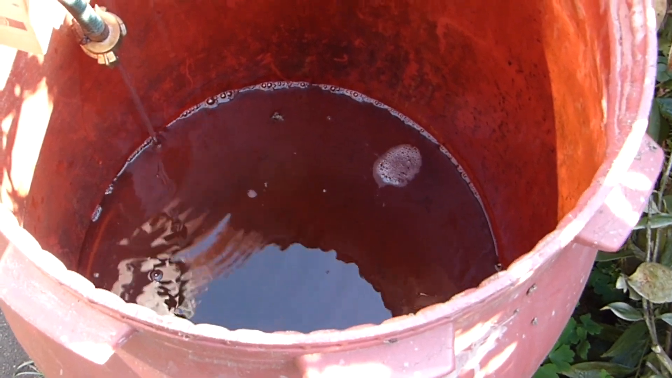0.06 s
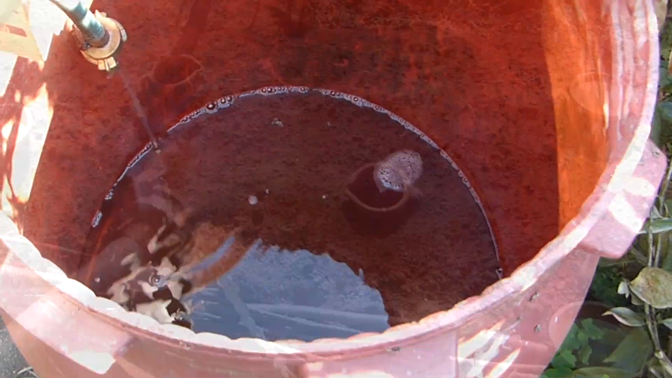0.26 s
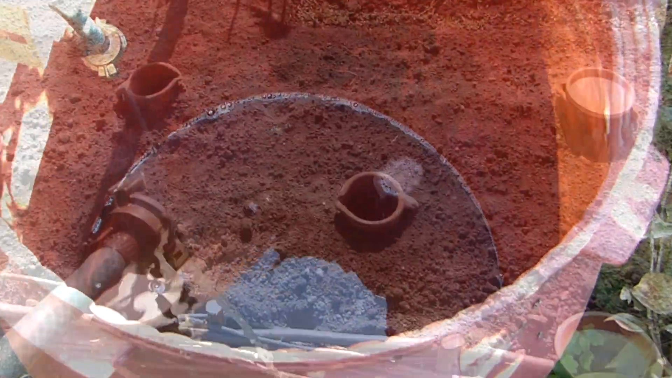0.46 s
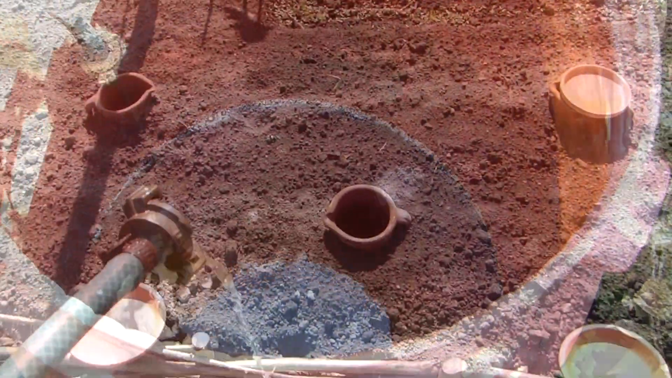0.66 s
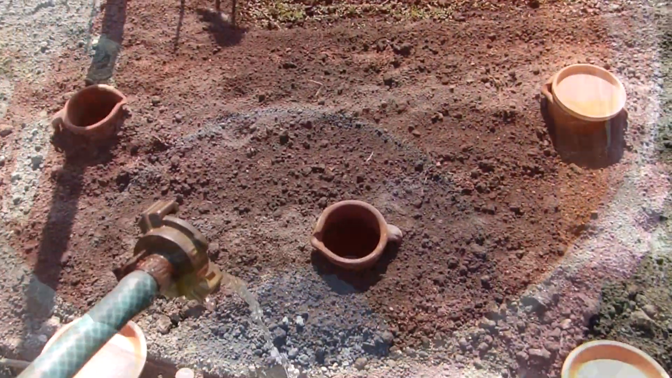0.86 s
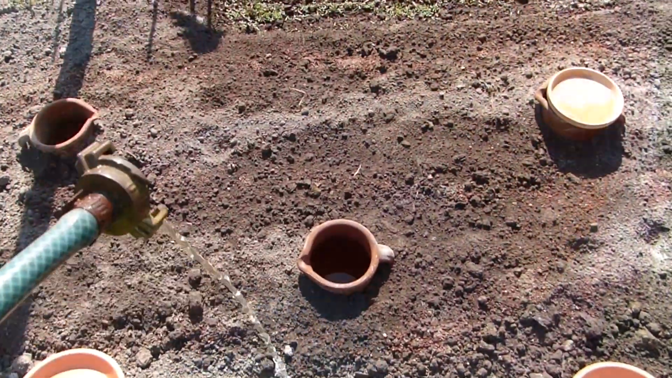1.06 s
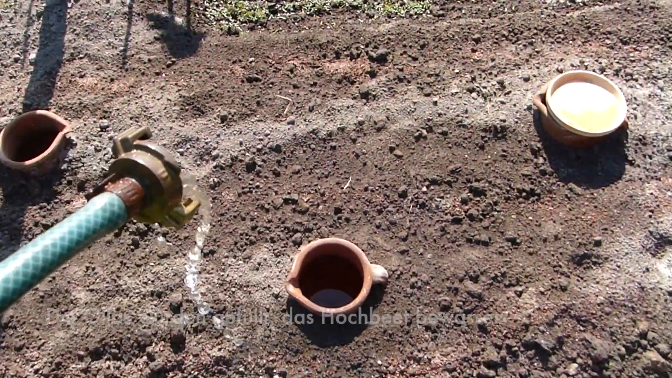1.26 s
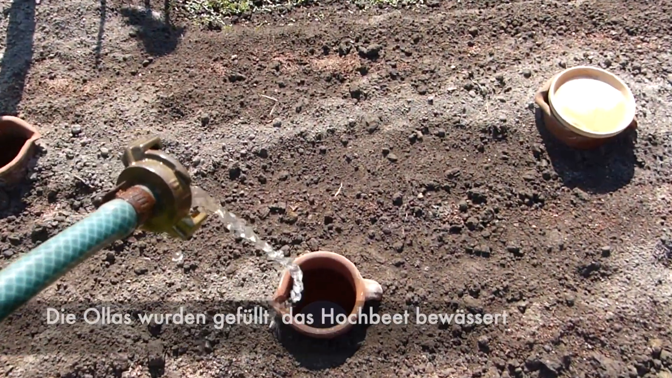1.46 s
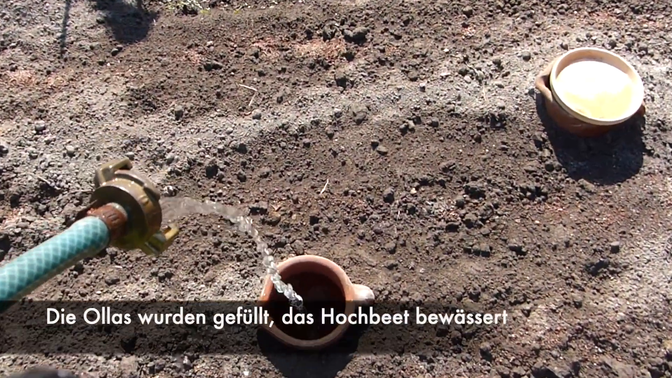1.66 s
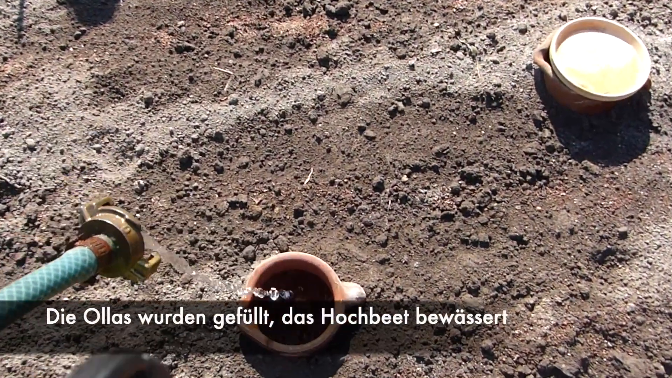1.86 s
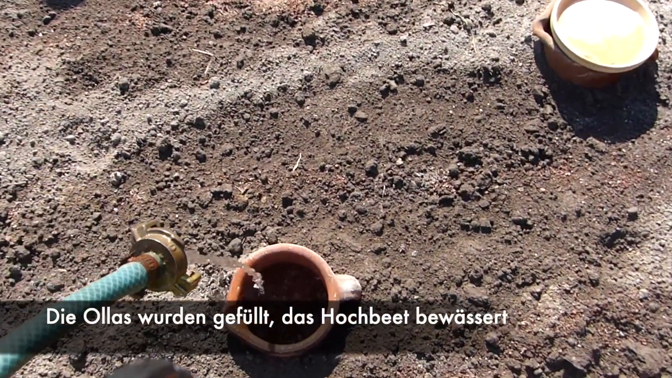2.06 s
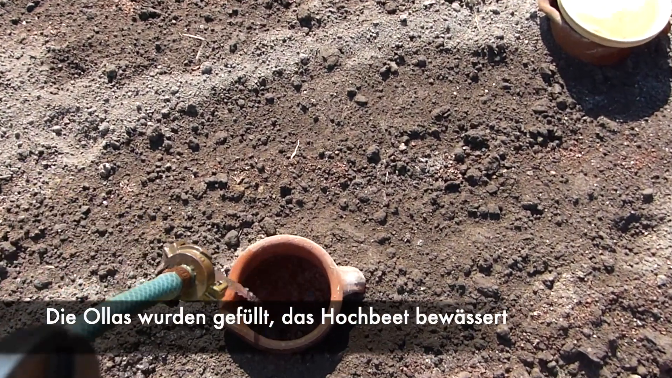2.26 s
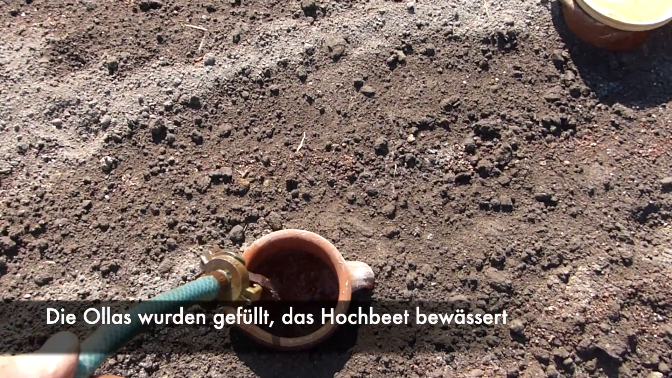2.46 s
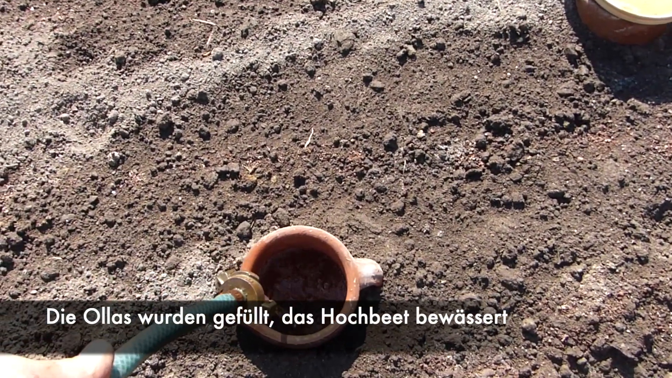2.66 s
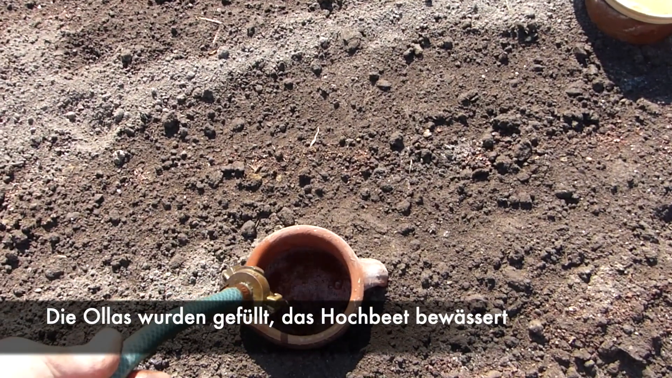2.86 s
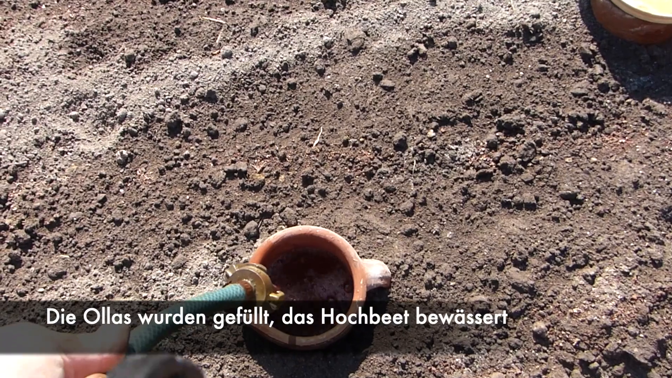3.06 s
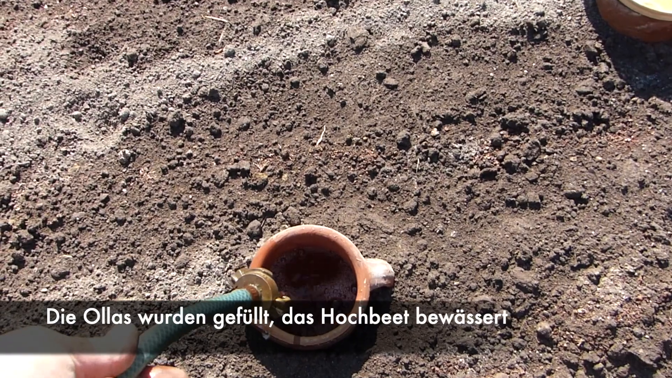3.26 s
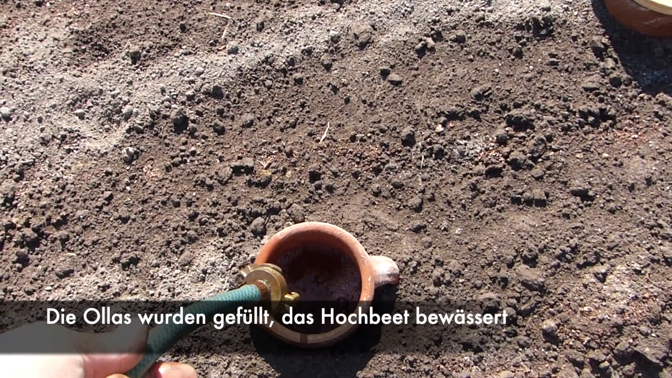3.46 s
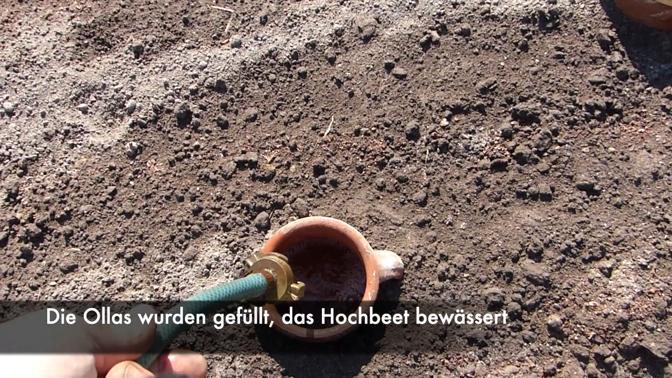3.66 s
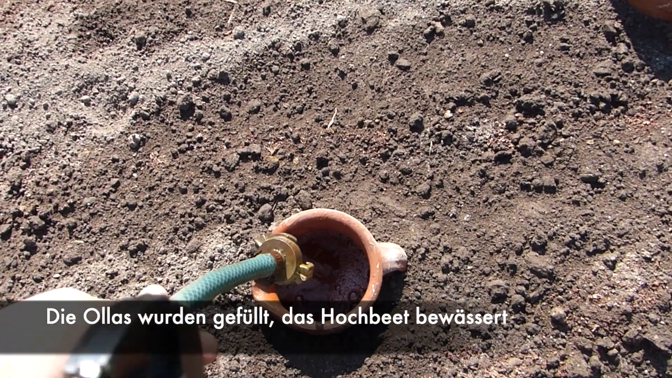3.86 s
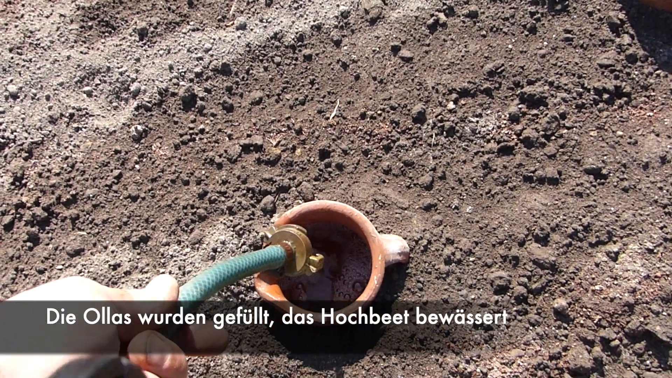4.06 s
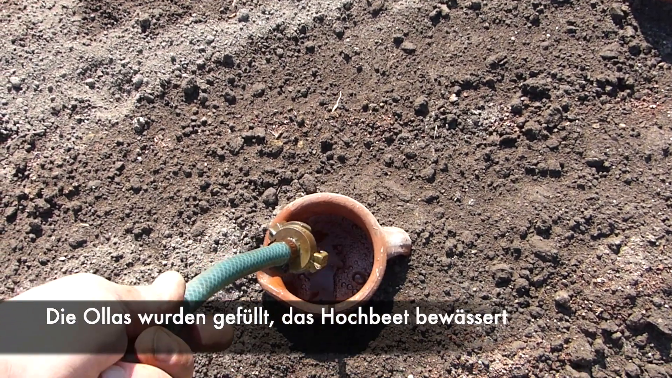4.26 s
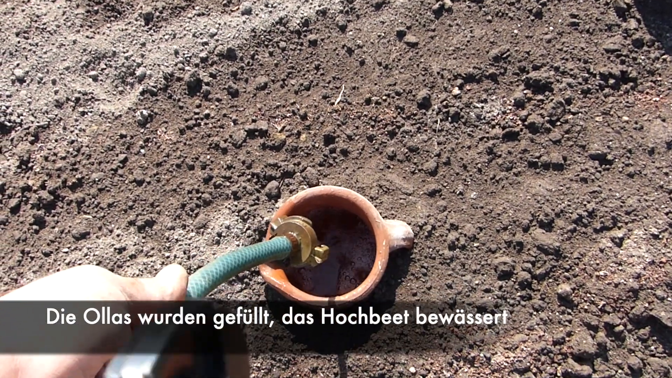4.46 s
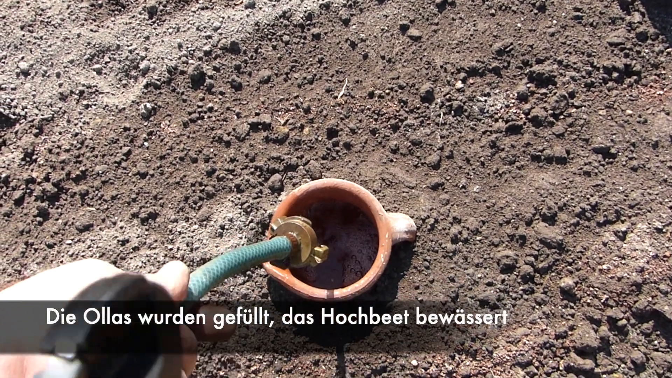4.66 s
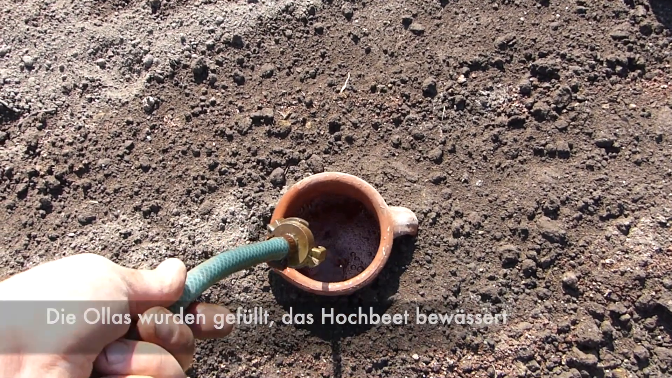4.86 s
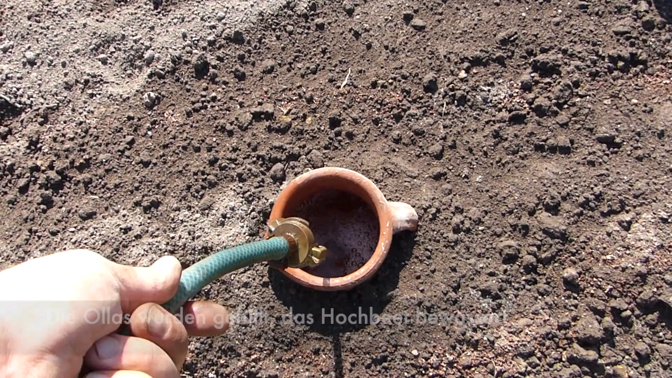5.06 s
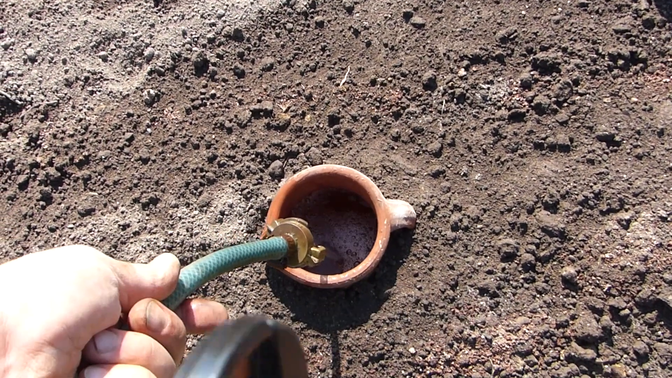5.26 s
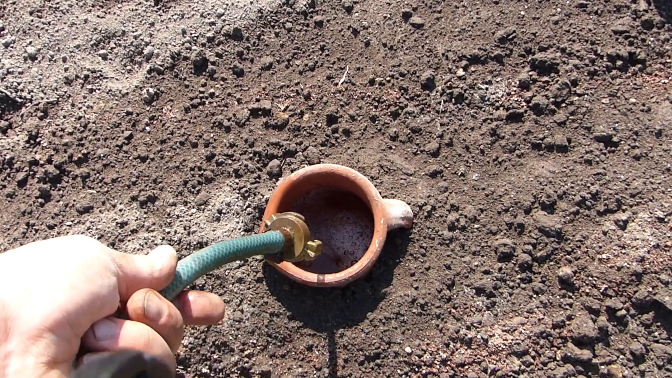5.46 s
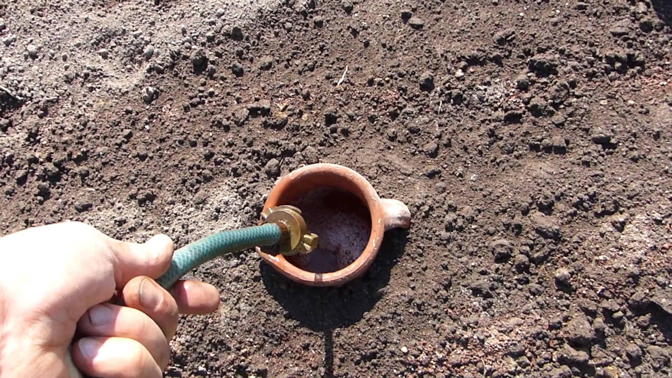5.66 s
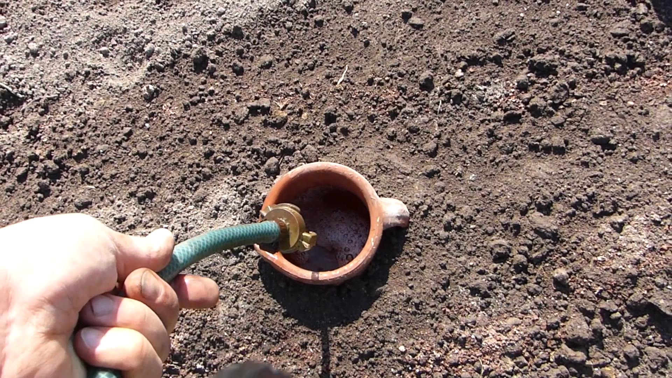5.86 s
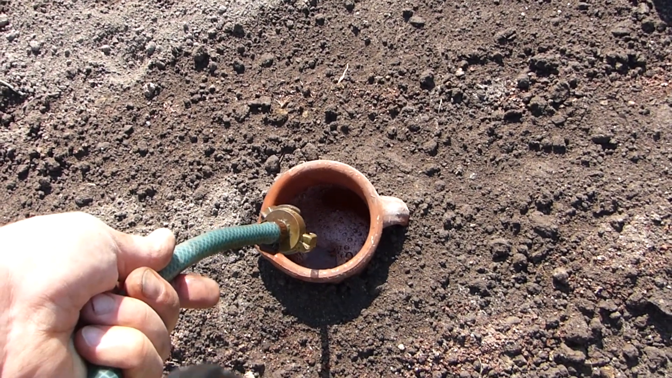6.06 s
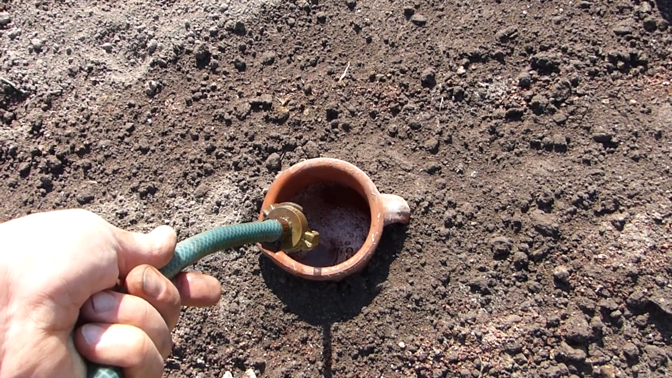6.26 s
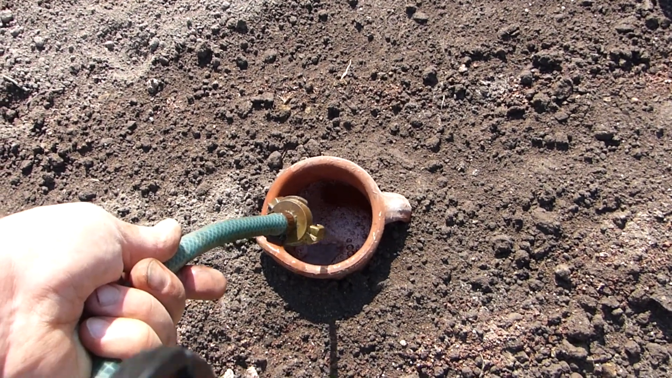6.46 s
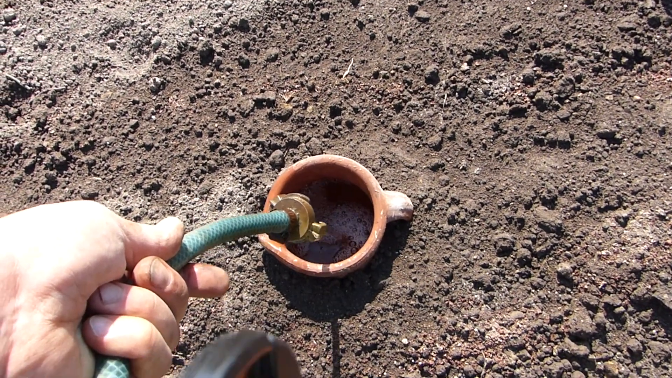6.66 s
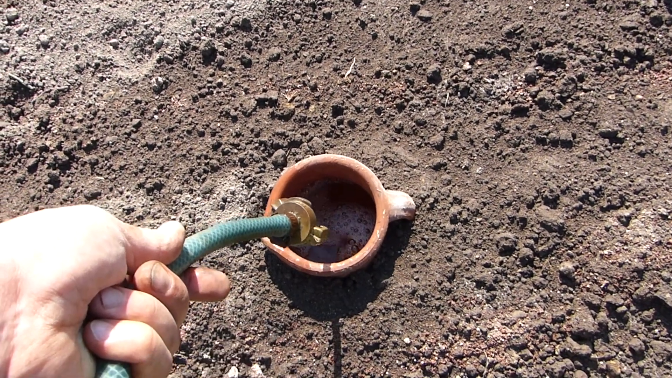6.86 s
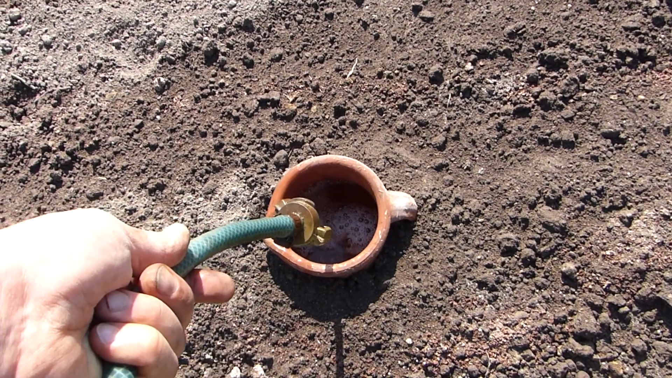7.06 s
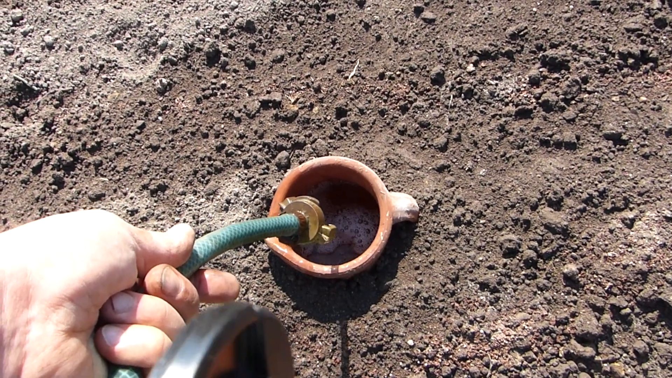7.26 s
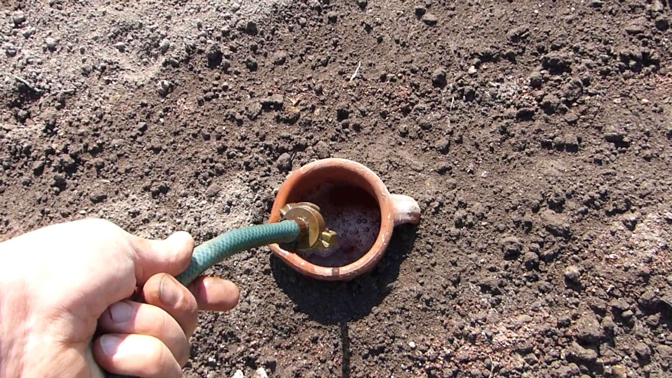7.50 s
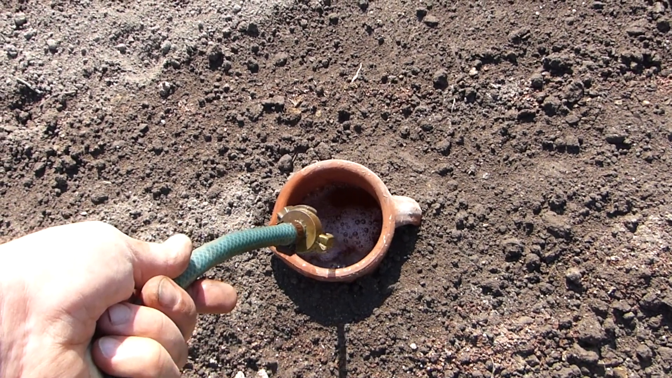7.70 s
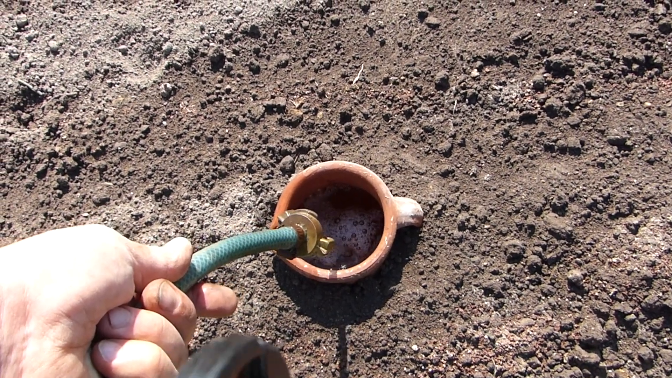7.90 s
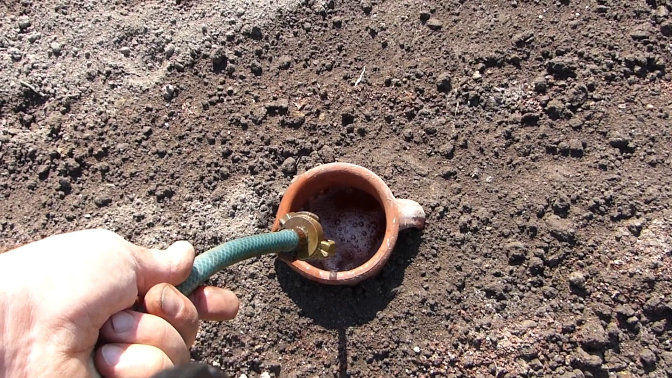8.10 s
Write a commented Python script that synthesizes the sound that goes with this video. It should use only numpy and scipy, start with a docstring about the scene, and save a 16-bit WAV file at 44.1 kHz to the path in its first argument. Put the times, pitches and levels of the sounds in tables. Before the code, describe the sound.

Water crackles onto earth, plunges gulping into a buried clay jar, then trickles softly with small bubbles among bright birdsong and faint plastic knocks.

```python
"""In a garden, a hose spatters on dry soil, then splashes into a buried clay pot that gulps on one low note.
Later the jet runs down the inner wall: mostly small bubbles and fizz, so songbirds stand out all round. A
dangling lens cap now and then knocks on the camera. Water is made of many short damped tones and noise, the pot
of ringing air, the birds of gliding tones, the knocks of body tones and noise bursts, and the background of
coloured noise."""
import sys
import numpy as np
from scipy import signal
from scipy.fft import rfft, irfft, next_fast_len
from scipy.io import wavfile
from scipy.ndimage import uniform_filter1d, map_coordinates

SR = 44100
rng = np.random.default_rng(int(sys.argv[2]) if len(sys.argv) > 2 else 0)


def store_pcm(level_fs):
    """Save levels as 16-bit WAV."""
    pcm = np.round(np.clip(level_fs, -1, 1) * 32767).astype(np.int16)
    wavfile.write(sys.argv[1], SR, np.atleast_2d(pcm).T)


N = 358533  # length in samples

# Background noise: (time [s], level [dB])
NOISE_LEVEL = [(.2, -83), (.55, -48), (1.1, -36.5), (2.2, -43.5), (3.6, -35.5), (4.8, -35), (4.9, -41.5),
               (5.25, -38.5), (6.2, -34), (8.1, -34)]
# Tone colour of the background noise: (frequency [Hz], level [dB])
NOISE_COLOUR = [(25, -3), (58, -11), (100, -2), (200, -0.5), (330, -6.5), (720, 2.5), (1500, -4),
                (3000, -11.5), (12500, -21), (16000, -31)]
# How alike the background noise is in both ears, negative when opposite: (frequency [Hz], likeness [-1 to 1])
NOISE_LIKENESS = [(60, 0.98), (300, -0.74), (700, -0.63), (2500, 0.64)]

# Notes of a rising two-note phrase: (time into phrase [s], length [s], first pitch [Hz], last pitch [Hz],
# added level [dB])
ZIP_NOTES = [(0, 0.052, 5530, 7660, -2), (.043, .026, 5410, 7590, 2.5)]
# When the rising phrase is sung: (time [s], level [dB])
ZIP_TIMES = [(3.158, -38), (5.186, -34), (6.922, -24.5), (7.061, -24.5), (7.206, -27.5)]
# When single thin lisps are sung: (time [s], level [dB])
LISP_TIMES = [(1.28, -31), (1.375, -35), (1.481, -35)]
# Hooked notes of the seesaw phrase: (time into phrase [s], length [s], held pitch [Hz], added level [dB])
SEESAW_NOTES = [(0, 0.06, 4440, 0.5), (0.084, 0.051, 4480, -5.5), (.185, .13, 3364, -15.5)]
# Lone hooked notes: (time [s], length [s], held pitch [Hz], level [dB])
HOOKS = [(6.597, 0.047, 3810, -30), (6.925, 0.073, 4720, -27.5), (7.322, 0.054, 3650, -29.5),
         (7.643, 0.05, 3950, -27), (7.962, 0.088, 4780, -30)]
# Pitch shapes of curled notes: (time into note [s], pitch [Hz])
TWIRL_SHAPE = [(0, 3750), (.006, 6100), (.019, 6700), (.024, 4930), (.031, 5780), (.035, 4700), (.04, 5110),
               (.048, 4040)]
UPTURN_SHAPE = [(0, 2040), (.016, 2340), (.034, 3550)]
ARCH_SHAPE = [(0, 3450), (.009, 4320), (.018, 3200), (.042, 2700), (.062, 2150)]
HIGH_ARCH_SHAPE = [(0, 6240), (.013, 7400), (.05, 5400)]
# When the curled notes are sung: (time [s], level [dB])
TWIRL_TIMES = [(5.582, -18), (5.668, -19), (5.754, -19.5)]
UPTURN_TIMES = [(5.361, -25.5), (5.501, -25.5)]
ARCH_TIMES = [(4.963, -25), (5.145, -24)]
HIGH_ARCH_TIMES = [(5.027, -33.5), (6.77, -31)]
# Quick downward chirps: (time [s], length [s], first pitch [Hz], level [dB])
CHIRPS = [(4.032, 0.033, 5420, -22.5), (4.277, 0.037, 5500, -19), (4.863, 0.033, 4650, -28.5),
          (5.308, 0.019, 5910, -25), (5.45, 0.014, 6300, -24), (5.832, 0.036, 3730, -27),
          (5.922, 0.065, 4490, -21)]
# Held whistles that sag a little: (time [s], length [s], first pitch [Hz], level [dB])
WHISTLES = [(1.025, .075, 7450, -34), (3.212, 0.5, 3930, -33), (4.97, 0.27, 9000, -41.5),
            (5.253, 0.12, 7450, -29.5), (5.396, 0.083, 7300, -28.5), (7.274, 0.059, 5790, -27.5)]
# Notes with a fast, wide vibrato: (time [s], length [s], pitch [Hz], swing [Hz], swing rate [per s],
# level [dB])
BUZZES = [(3.83, .33, 8300, 280, 115, -41), (5.97, 0.16, 2540, 260, 68, -31.5)]

# Songs of evenly spaced or slowing notes, weaker on both sides of a climax
SEESAW_SONG = dict(start_s=3.21, period_s=.285, count=8, climax_s=4.17, climax_db=-17.5, fall_db=10)
SWOOP_SONG = dict(start_s=4.347, period_s=.0639, count=8, climax_s=4.36, climax_db=-19.5, fall_db=23)
LISP_SONG = dict(start_s=5.535, period_s=.089, slowing_s=.00088, count=10, climax_s=6.34,
                 climax_db=-22.5, fall_db=5.5)
# The note after a lone hook: its first pitch over the hook's, and the share it falls
SLUR = dict(gap_s=.012, length_s=.04, lift=1.13, fall=0.201)
# A short hoarse note between the upturns
CROAK = dict(start_s=5.394, length_s=0.027, hz=2163, db=-17.5, rough=0.055)
SWOOP_S, SWOOP_HZ = 0.034, 4770
LISP_S, LISP_FROM_HZ, LISP_TO_HZ = 0.06, 5920, 5480
FALL_SHARE, SAG_SHARE = 0.565, .94  # last pitch over first, for a chirp and a whistle
SETTLE = 1.4  # how much a glide levels off
HOOK_SHARE = 0.2664  # how far above its held pitch a hooked note starts
NOTE_ATTACK, NOTE_RELEASE = 0.26, 0.39  # shares of a note's length
BIRD_LEFT_DB, BIRD_ECHO_DB, BIRD_T60_S = -6.5, -2.5, .55  # left minus right, echo level, echo time

# Lens cap striking the camera: (time [s], level [dB])
KNOCKS = [(0.628, -37.5), (0.691, -37.5), (0.908, -28.5), (0.95, -29.5), (2.534, -30.5), (2.611, -29.5),
          (2.769, -31.5), (4.819, -26.5), (4.856, -28), (4.92, -28), (5.106, -26.5), (7.293, -33.5),
          (7.836, -36)]
# Ringing tones of the camera body: (frequency [Hz], level [dB], time to fade by 60 dB [s])
BODY_TONES = [(696, 12.5, 0.063), (470, -1, 0.13), (885, 0.5, 0.037), (227.3, -8, 0.29)]
KNOCK_RING_DB, KNOCK_THUD_DB, KNOCK_TICK_DB = 9.5, 20, 8  # added to each knock's level

# Tone colour of the spray: (frequency [Hz], level [dB])
SPRAY_COLOUR = [(1200, -11), (4800, -3), (9500, 3.5), (13000, -2.5), (16000, -14)]
# Jet wandering over the soil: (time [s], splash level [dB])
ON_SOIL = [(0.28, -57.5), (0.476, -46.5), (0.526, -37), (0.97, -37), (1.19, -30.5), (1.23, -25.5),
           (1.38, -37), (1.424, -40), (1.56, -43.5)]
# Jet falling free into the pot: (time [s], splash level [dB])
IN_POT = [(1.59, -24.5), (1.71, -22), (1.926, -27.5), (1.975, -17.5), (2.03, -23), (2.11, -38),
          (2.155, -30.5), (2.175, -21.5), (2.23, -21), (2.27, -33.5), (2.34, -23.5), (2.376, -31),
          (2.72, -25), (2.782, -34.5), (2.87, -28), (3.25, -28)]
# The pool deepening under the jet: (time [s], share of the splash that is bubbles [0-1])
POOL_DEPTH = [(1.5, 0), (1.65, 0.4), (2.2, 0.68), (2.5, 0.84)]
# Jet running down the wall: (time [s], bubble level [dB], fizz level [dB])
WALL_FLOW = [(3.25, -36.5, -47), (3.55, -43, -47), (3.72, -31, -44), (4.25, -32, -35.5),
             (4.7, -37.5, -38.5), (4.95, -52, -55), (5.2, -42, -45), (5.4, -38.5, -38), (6.7, -34.5, -41),
             (8.1, -41, -42.5)]
# Hard drops slapping soil and clay: (time [s], level [dB])
SLAPS = [(0.597, -27), (0.679, -20), (0.728, -23.5), (1.058, -21), (1.1465, -18), (1.21, -17),
         (1.228, -14.5), (1.4286, -16), (1.462, -16), (1.602, -13), (1.648, -13.5), (2.1712, -14),
         (2.2143, -16), (2.856, -12.5), (6.6115, -19), (7.836, -24.5)]
# Largest single bubbles: (time [s], level [dB], starting pitch [Hz])
POPS = [(1.6282, -6.5, 2980), (1.697, -4.5, 1560), (1.7295, -4, 4440), (1.737, -3, 4640),
        (1.7725, -2, 3920), (1.8077, -7, 4300), (1.822, -14.5, 1890), (1.839, -6, 3660),
        (1.874, -7.5, 3070), (1.9665, -11, 1274), (2.0226, -5, 2350), (2.3386, -7, 2990), (2.54, -8, 2930),
        (2.6426, -6, 4260), (2.6818, -11, 2870), (2.6993, -9, 4400), (2.7375, -2, 2690), (3.0799, -9, 4660),
        (4.315, -6, 3310), (4.4906, -7, 3450), (6.739, -11, 3600), (6.7863, -13.5, 3750),
        (7.496, -12, 4570), (7.836, -18.5, 1790), (7.924, -14.5, 4100)]
# Gulps of the belly: (time [s], level [dB], starting pitch [Hz])
GULPS = [(1.853, -19, 553), (1.871, -18, 633), (1.91, -17.5, 575), (1.947, -17, 670), (1.962, -14, 595),
         (1.978, -15.5, 570), (2.026, -15.5, 575), (2.175, -18.5, 530), (2.213, -17, 636),
         (2.338, -13.5, 582), (2.371, -13.5, 563), (2.503, -11.5, 596), (2.649, -13.5, 572.7),
         (2.816, -16, 565.4), (2.999, -9, 583), (3.023, -6, 568), (3.054, -9.5, 589), (3.081, -14, 636),
         (3.112, -15.5, 566.5), (5.41, -16.5, 646)]
# Slugs of water striking the bottom: (time [s], level [dB], starting pitch [Hz])
THUDS = [(1.963, -16.5, 390), (2.228, -3.5, 560)]
# How much of the jet hits the pool: (time [s], share [0-1])
POOL_HIT = [(1.65, 0.06), (1.95, 0.78), (5.5, 0.28)]
# Upper air resonances of the pot: (frequency [Hz], width [Hz], level [dB])
HOLLOW_TONES = [(1620, 37, 1.5), (3374, 160, -4)]
HUM_HZ, HUM_WANDER = 600, .055  # the belly's note, and the share by which it wanders
GULP_CYCLES, GULP_RISE, GULP_ROUGH_DB = 6.6, 0.047, 2.5  # a gulp's life, pitch climb and unevenness
HUM_DB, GURGLE_DB = -3.5, -0.5  # relative to the splash that drives them

TOP_HZ = 15900  # upper limit of the sound


def amp(db):
    """Turn decibels into a multiplier."""
    return 10 ** (np.asarray(db) / 20)


def unit(x):
    """Scale a sound to an average strength (rms) of 1."""
    return x / np.sqrt(np.mean(x ** 2) + 1e-20)


def clock(length):
    """Sample times in seconds, from zero."""
    return np.arange(int(length * SR)) / SR


def along(points, hz):
    """Join (Hz, value) points by straight lines on a log frequency axis."""
    f, v = np.transpose(points)
    return np.interp(np.log(hz + 1), np.log(f + 1), v)


def curves(rows, t=np.arange(N) / SR):
    """Join each column after the time by straight lines."""
    s, *cols = np.transpose(rows)
    return [np.interp(t, s, c) for c in cols]


def wobble(rate, size=N):
    """A smooth random curve with rate random points a second."""
    knots = rng.standard_normal(int(size * rate / SR) + 4)
    return map_coordinates(knots, [np.arange(size) * rate / SR])


def filtered(x, response):
    """Shape a sound by a response that depends on frequency."""
    m = next_fast_len(N + SR // 2)
    spectrum = rfft(x, m) * response(np.fft.rfftfreq(m, 1 / SR))
    return irfft(spectrum, m)[..., :N]


def butter(x, order, hz, kind):
    """Pass a sound through a smooth high-pass or band-pass filter."""
    return signal.lfilter(*signal.butter(order, hz, kind, fs=SR), x)


def add(track, s, sound):
    """Mix a sound into a track at time s."""
    part = track[..., max(0, round(s * SR)):][..., :sound.shape[-1]]
    part += sound[..., :part.shape[-1]]


def panned(x, left_db):
    """Place a sound in stereo, the left louder than the right by left_db."""
    return x * amp(np.array([[left_db], [-left_db]]) / 2)


def echo(x, t60):
    """A diffuse stereo tail: fading noise, scaled so its left side has unit energy."""
    t = clock(t60)
    tail = rng.standard_normal((2, len(t))) * 1000 ** (-t / t60)
    return signal.fftconvolve(x[None], tail / np.linalg.norm(tail[0]), axes=1)[:, :N]


def background():
    """A soft rush of noise whose middle range is largely opposite in the two ears."""
    def width(hz):
        return np.tan(np.arccos(np.clip(along(NOISE_LIKENESS, hz), -.9, 1)) / 2)

    mid, side = filtered(rng.standard_normal((2, N)), lambda hz: amp(along(NOISE_COLOUR, hz)))
    side = filtered(side, width)
    level_db, = curves(NOISE_LEVEL)
    return amp(level_db + 1.87 * wobble(9)) * np.array([mid + side, mid - side]) / np.std(mid)


def whistle(hz, gain, rough=0.0055):
    """A bird's pure tone, unsteady in strength and, by the share rough, in pitch."""
    hz = hz * (1 + rough * wobble(901, len(hz)))
    return gain * amp(2.96 * wobble(114.3, len(hz))) * np.sin(2 * np.pi * np.cumsum(hz) / SR)


def note(length, first_hz, last_hz, db, rough=0.0048):
    """A glide that settles onto its last pitch, under an attack, a hold and a release."""
    t = clock(length)
    u = t / length
    hz = last_hz + (first_hz - last_hz) * (1 - u) ** SETTLE
    envelope = np.clip(np.minimum(u / NOTE_ATTACK, (1 - u) / NOTE_RELEASE), 0, 1)
    return whistle(hz, amp(db) * envelope, rough)


def repeats(start_s, period_s, count, climax_s, climax_db, fall_db, slowing_s=0):
    """Rows (time [s], level [dB]) of a steady or slowing song, fall_db weaker one second from its climax."""
    k = np.arange(count)
    times = start_s + period_s * k + slowing_s * k ** 2
    return zip(times, climax_db - fall_db * (times - climax_s) ** 2)


def sing(phrase, times):
    """The gliding notes of one phrase, sung at each given time."""
    out = np.zeros(N)
    for s, phrase_db in times:
        for late, length, first_hz, last_hz, db in phrase:
            add(out, s + late, note(length, first_hz, last_hz, phrase_db + db))
    return out


def calls(rows, share, rough):
    """Single notes that each slide to the same share of their first pitch."""
    out = np.zeros(N)
    for s, length, hz, db in rows:
        add(out, s, note(length, hz, share * hz, db, rough))
    return out


def hooked(rows, drop_s):
    """Notes that drop quickly onto a pitch and hold it."""
    out = np.zeros(N)
    for s, length, held_hz, db in rows:
        t = clock(length)
        hz = held_hz * (1 + HOOK_SHARE * np.exp(-t / drop_s))
        envelope = signal.windows.tukey(len(t), .25)
        add(out, s, whistle(hz, amp(db) * envelope, rough=0.0096))
    return out


def slurs(gap_s, length_s, lift, fall):
    """After each lone hooked note, a higher one that curves downward."""
    out, u = np.zeros(N), clock(length_s) / length_s
    for s, length, hook_hz, db in HOOKS:
        hz = lift * hook_hz * (1 - fall * u ** 2)
        add(out, s + length + gap_s, whistle(hz, amp(db) * signal.windows.hann(len(u))))
    return out


def curled(shape, times, crest):
    """A note that bends through a pitch shape, loudest at the share crest of its length."""
    out, t = np.zeros(N), clock(shape[-1][0])
    hz = uniform_filter1d(curves(shape, t)[0], size=SR // 300)
    swell = np.sqrt(np.interp(t / t[-1], [0, min(crest, 1), 1], [0, 1, 0]))
    for s, db in times:
        add(out, s, whistle(hz, amp(db) * swell, rough=0.024))
    return out


def buzzes():
    """Notes made fuzzy by a fast, wide vibrato."""
    out = np.zeros(N)
    for s, length, centre_hz, swing_hz, rate, db in BUZZES:
        t = clock(length)
        hz = centre_hz + swing_hz * np.sin(2 * np.pi * rate * t)
        add(out, s, whistle(hz, amp(db) * signal.windows.tukey(len(t))))
    return out


def croak(start_s, length_s, hz, db, rough):
    """A nearly level note broken up by strong pitch jitter."""
    return calls([(start_s, length_s, hz, db)], SAG_SHARE, rough)


def seesaw():
    """A repeated phrase of hooked notes."""
    rows = []
    for s, phrase_db in repeats(**SEESAW_SONG):
        for late, length, hz, db in SEESAW_NOTES:
            rows.append((s + late, length, hz, phrase_db + db))
    return hooked(rows, drop_s=0.0029)


def birds():
    """Several songbirds, mostly to the right, echoed by the garden."""
    out = sing(ZIP_NOTES, ZIP_TIMES)
    # a second voice beats against the rising phrase
    out *= 1 + 0.82 * np.sin(2 * np.pi * np.cumsum(1100 + 200 * wobble(60)) / SR)
    out += seesaw() + hooked(HOOKS, drop_s=0.00876) + slurs(**SLUR)
    out += sing([(0, SWOOP_S, SWOOP_HZ, FALL_SHARE * SWOOP_HZ, 0)], repeats(**SWOOP_SONG))
    out += sing([(0, LISP_S, LISP_FROM_HZ, LISP_TO_HZ, 0)], [*LISP_TIMES, *repeats(**LISP_SONG)])
    out += curled(TWIRL_SHAPE, TWIRL_TIMES, crest=0.95)
    out += curled(UPTURN_SHAPE, UPTURN_TIMES, crest=0.97)
    out += curled(ARCH_SHAPE, ARCH_TIMES, crest=0.089)
    out += curled(HIGH_ARCH_SHAPE, HIGH_ARCH_TIMES, crest=0.23)
    out += calls(CHIRPS, FALL_SHARE, rough=0.044) + calls(WHISTLES, SAG_SHARE, rough=0.0092)
    out += buzzes() + croak(**CROAK)
    return panned(out, BIRD_LEFT_DB) + amp(BIRD_ECHO_DB) * echo(out, t60=BIRD_T60_S)


def knocks():
    """A plastic tick and a dull thud; the camera body rocks, pushing its two microphones in opposite senses."""
    body, thuds, ticks, t = np.zeros(N), np.zeros(N), np.zeros(N), clock(0.053)
    for s, db in KNOCKS:
        ring = np.zeros(len(t))
        for hz, level, t60 in BODY_TONES:
            tone_db = level + rng.normal(0, 1.8) - 60 * t / t60
            ring += amp(tone_db) * np.sin(2 * np.pi * hz * t)
        thud = rng.standard_normal(len(t)) * amp(-60 * t / 0.063)
        tick = rng.standard_normal(len(t)) * amp(-60 * t / 0.03)
        add(body, s, amp(db + KNOCK_RING_DB) * ring)
        add(thuds, s, amp(db + KNOCK_THUD_DB) * thud)
        add(ticks, s, amp(db + KNOCK_TICK_DB) * tick)
    body += butter(thuds, 2, [180, 1100], "band")
    body = butter(body, 2, 160, "high")
    ticks = filtered(ticks, lambda hz: 2j * hz / 1000 / (1 + 1j * hz / 1000) ** 2)  # strongest near 1 kHz
    return np.array([body, -.45 * body]) + ticks


def bubble(t, hz, cycles, rise=0.1):
    """A damped sine that swells softly and whose pitch climbs as the bubble surfaces."""
    age = t * hz / cycles
    tone = np.sin(2 * np.pi * hz * t * (1 + rise * age / (1 + age)))
    return tone * np.exp(-age) * np.tanh(2 * age) ** 2 * 2


def bubbles(rate, hz, spread, cycles, size_db):
    """A cloud of rate bubbles a second with random pitches, lives and sizes; rms 1."""
    count = int(rate * N / SR)
    start = rng.integers(N, size=count)
    pitch, life, size = np.clip(rng.standard_normal((count, 3)), -2, 2).T[:, :, None]
    t = clock(min(8 * cycles / hz, .02))
    grains = bubble(t, hz * np.exp(spread * pitch), cycles * np.exp(life / 3))
    grains = amp(size_db * size) * grains
    places = start[:, None] + np.arange(len(t))
    return unit(np.bincount(places.ravel(), grains.ravel(), N)[:N])


def spray(rate, mist):
    """Tiny droplets, each a tick of its own pitch, over a smooth mist of noise; rms 1."""
    ticks = bubbles(rate, hz=6750, spread=0.504, cycles=1.36, size_db=5)
    return unit(filtered(ticks + mist * rng.standard_normal(N), lambda hz: amp(along(SPRAY_COLOUR, hz))))


def pool_share():
    """How far the pool has grown, from 0 to 1."""
    return np.clip(curves(POOL_DEPTH)[0], 0, 1)


def pouring():
    """The free jet arrives in slugs: crackling spray on soil, bubbles of three sizes once there is a pool."""
    splash_db = curves([*ON_SOIL, *IN_POT])[0]
    wet = pool_share()
    churn = bubbles(rate=1300, hz=4500, spread=0.278, cycles=4.6, size_db=6)
    churn += amp(-3.5) * bubbles(rate=300, hz=3150, spread=0.217, cycles=6.4, size_db=7.0)
    # big ones in shallow water
    churn += amp(4.5) * (1 - wet) * bubbles(rate=800, hz=1850, spread=0.3, cycles=5.2, size_db=4.0)
    splash = np.sqrt(wet) * unit(churn) + np.sqrt(1 - wet) * spray(rate=850, mist=0.45)
    slugs = unit(splash * amp(4.0 * wobble(170)))
    free = np.interp(np.arange(N) / SR, [.25, .45, 3.2, 3.25], [0, 1, 1, 0])
    return amp(splash_db - 0.5) * slugs * free


def filling():
    """The calmer jet on the wall drags small bubbles under in clumps."""
    bubble_db, fizz_db = curves(WALL_FLOW)
    clumps = wobble(45)
    small = bubbles(rate=650, hz=3750, spread=0.15, cycles=5.1, size_db=5)
    small = amp(bubble_db + 2.4 * clumps) * small
    fizz = amp(fizz_db + 3.2 * clumps) * spray(rate=830, mist=0.6)
    fizz = filtered(fizz, lambda hz: 1 / (1 + (hz / 9500) ** 4))  # dulled deep in the pot
    fade_in = np.clip((np.arange(N) / SR - WALL_FLOW[0][0]) * 20 + 1, 0, 1)
    return (small + fizz) * fade_in


def drops():
    """Hard slaps as short noise cracks, and single big bubbles as damped tones."""
    out, t = np.zeros(N), clock(.04)
    for s, db in SLAPS:
        crack = rng.standard_normal(len(t)) * amp(-60 * t / 0.008) * np.tanh(t / 0.00038)
        crack = butter(crack, 2, [3800, 10500], "band")
        add(out, s, amp(db + 9.5) * crack / np.abs(crack).max())
    for s, db, hz in POPS:
        add(out, s, amp(db) * bubble(t, hz, cycles=4.3))
    return out


def pot(splash):
    """The belly's air rings with each gulp; splashing sets it gurgling and humming at a wandering pitch."""
    out, t = np.zeros(N), clock(.1)
    shallow = 1 - pool_share()
    for s, db, hz in GULPS:
        ring = bubble(t, hz, cycles=GULP_CYCLES, rise=GULP_RISE)
        ring *= amp(GULP_ROUGH_DB * wobble(183, len(t)))
        # a jet that reaches the bottom lands with a broad thud
        thump = shallow[round(s * SR)] * bubble(t, hz, cycles=1.8)
        add(out, s, amp(db - 1.5) * (ring + 2.3 * thump))
    for s, db, hz in THUDS:
        add(out, s, amp(db) * bubble(t, hz, cycles=2.05))
    phase = 2 * np.pi * np.cumsum(HUM_HZ * np.exp(HUM_WANDER * wobble(24))) / SR
    hum = amp(HUM_DB) * unit(wobble(55) * np.sin(phase) + wobble(55) * np.cos(phase))
    gurgle = bubbles(rate=600, hz=418.6, spread=0.331, cycles=2.9, size_db=7.0)
    gurgle = amp(GURGLE_DB) * shallow * gurgle
    force = np.sqrt(np.abs(uniform_filter1d(splash ** 2, SR // 100)))  # splash strength over 10 ms
    out += curves(POOL_HIT)[0] * force * (hum + gurgle)
    return butter(out, 4, 230, "high")  # the small mouth radiates no bass


def hollow(f):
    """Frequency response of the pot's upper air resonances, added as peaks."""
    total = 0
    for hz, width, db in HOLLOW_TONES:
        total = total + amp(db) * 1j * f * width / (hz * hz - f * f + 1j * f * width)
    return total


def water():
    """All the water, coloured by the hollow pot, with short reflections from the clay and the ground."""
    splash = butter(pouring() + filling() + drops(), 2, 250, "high")
    ringing = filtered(splash, hollow)
    reflections = amp(-7.5) * echo(splash, t60=0.07)
    return splash + ringing + reflections + panned(pot(splash), 4.5)


def scene():
    """The background noise, the birds, the knocks and the water together."""
    return background() + birds() + knocks() + water()


def record(dry):
    """The camera keeps almost nothing above its upper limit."""
    return filtered(dry, lambda hz: 1 / (1 + (hz / TOP_HZ) ** 80))


dry = scene()
out = record(dry)
store_pcm(out)
```